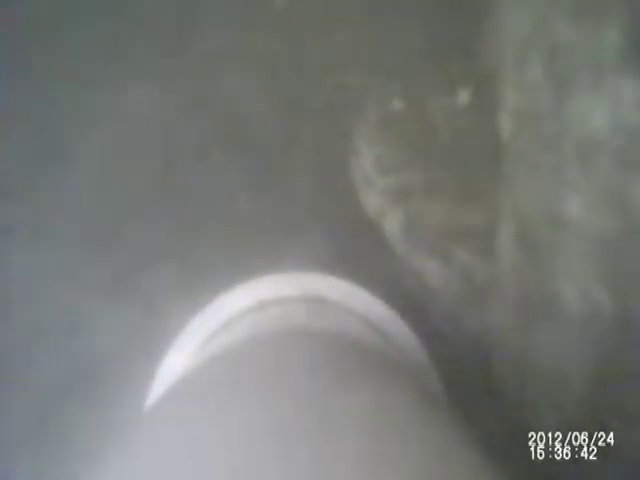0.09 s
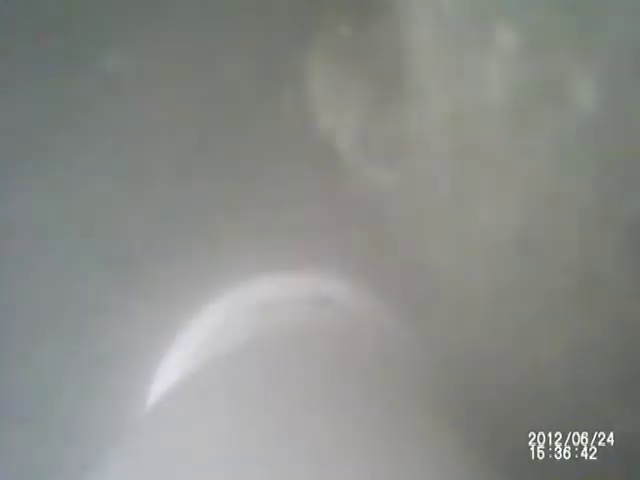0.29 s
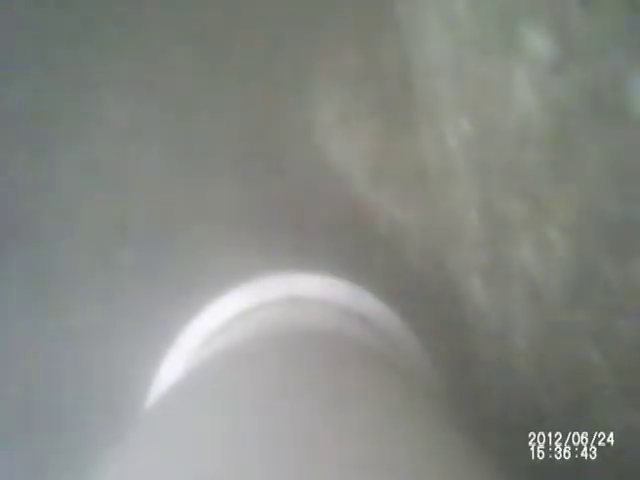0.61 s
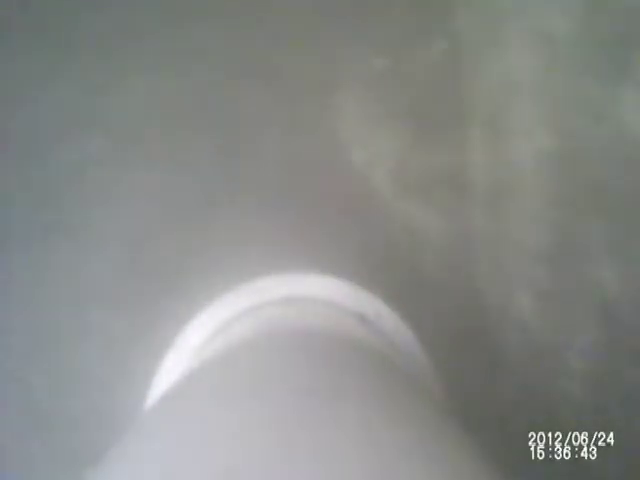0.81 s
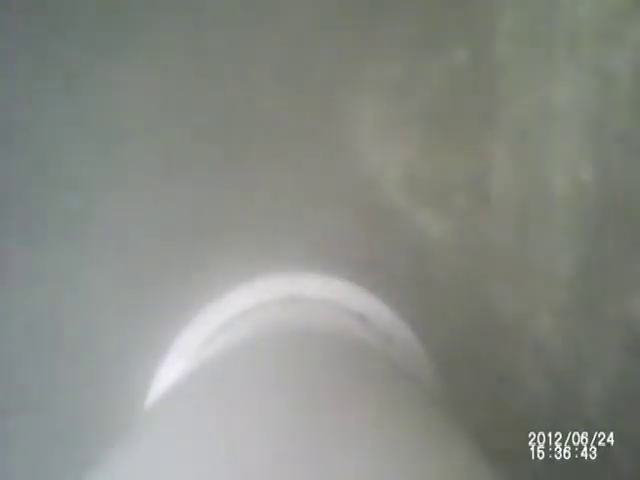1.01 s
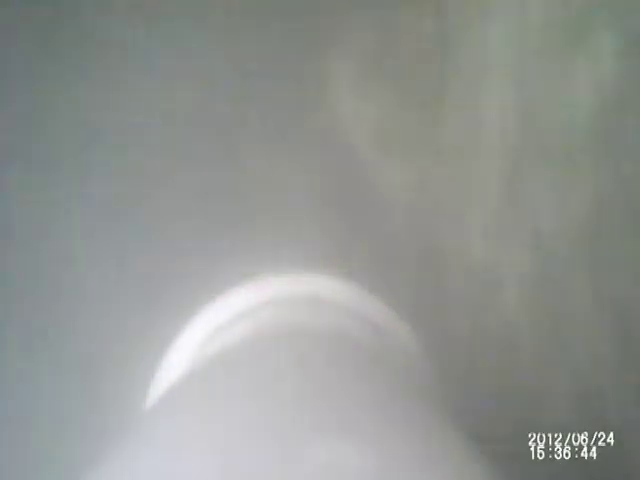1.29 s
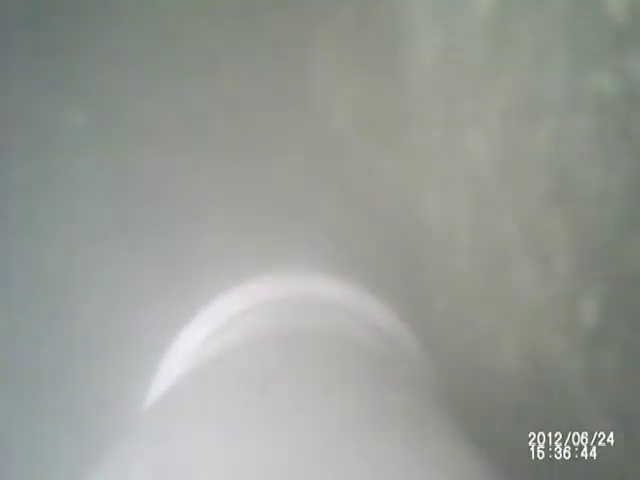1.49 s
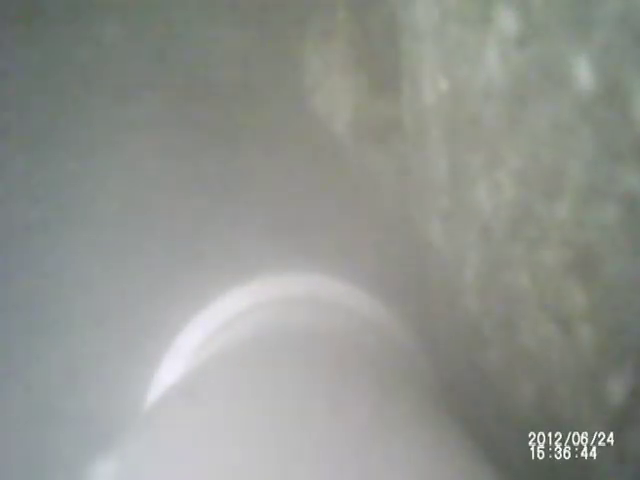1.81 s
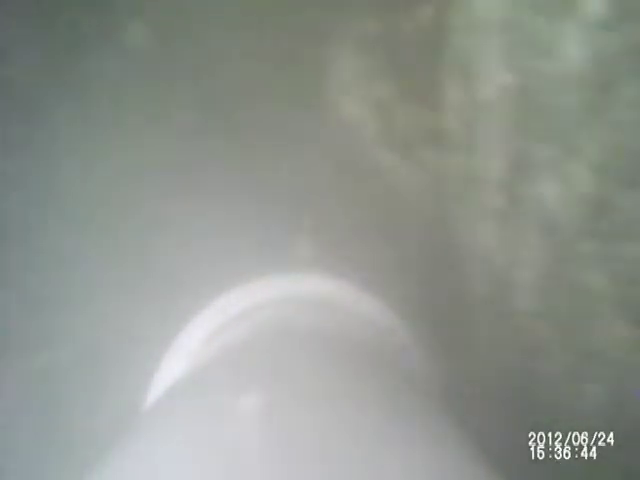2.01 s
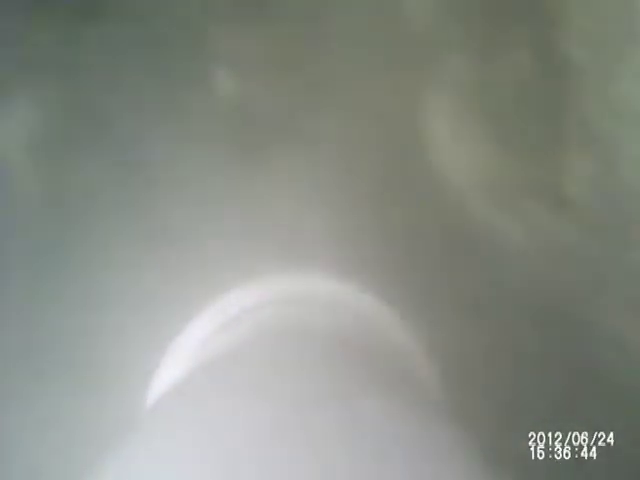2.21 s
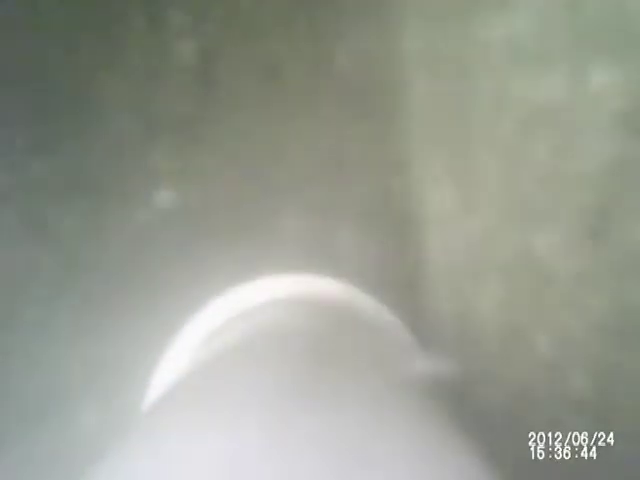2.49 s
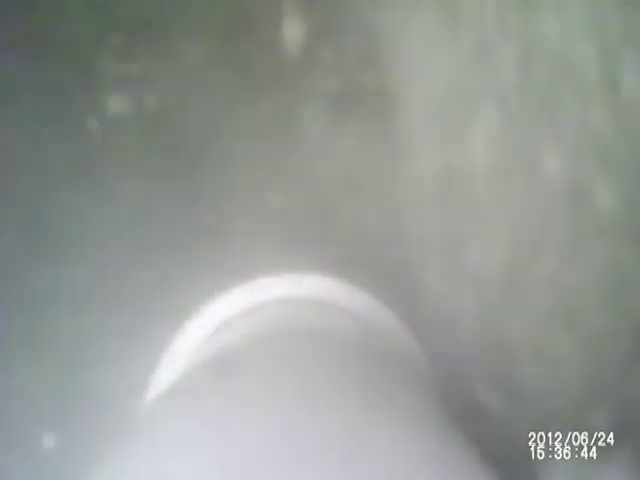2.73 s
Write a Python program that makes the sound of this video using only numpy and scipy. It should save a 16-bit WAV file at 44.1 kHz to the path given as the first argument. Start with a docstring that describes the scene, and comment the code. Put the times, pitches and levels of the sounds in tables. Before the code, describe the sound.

Stones clatter on a steel suction nozzle underwater: a dense burst of hard clicks, then scattered knocks, heavy thumps and gritty rattle over a faint water rush, captured very close by a small, overloading camera microphone.

```python
"""Stones click sharply on the steel of an underwater suction nozzle: damped modes under a short contact.
Larger rocks thump the pipe and camera housing, as low modes with a settling pitch; one faint gurgle is
made the same way. Fine grit rattles and rumbles, as random clumped blows on the modes, over the rush of
water, which is coloured noise. A small camera overloads on loud blows and samples slowly, which mirrors
the sound into the treble."""
import sys
import numpy as np
from scipy import signal
from scipy.fft import rfft, irfft
from scipy.io import wavfile
from scipy.ndimage import uniform_filter1d

SR = 44100
rng = np.random.default_rng(int(sys.argv[2]) if len(sys.argv) > 2 else 0)


def materialize(psi):
    """Save the field psi as 16-bit PCM at rate SR to the path in sys.argv[1].

    A 1-D psi becomes a single channel; in a 2-D psi each row is a channel.
    """
    bounded = np.clip(np.atleast_2d(psi).T, -1, 1)
    quanta = np.round(bounded * 32767).astype(np.int16)
    wavfile.write(sys.argv[1], SR, quanta)


N = 127890  # length [samples]
MODE_SCATTER_DB = 1.5  # standard deviation of mode strengths from blow to blow
STONE_RING_T60_S = 0.011  # decay of the stone's own ring, and of the grit's dry crack


def amp(db):
    """Decibel law: 20 dB is a factor of ten in amplitude."""
    return 10 ** (np.asarray(db) / 20)


def evened(x):
    """Normalization to unit root-mean-square value."""
    return x / np.sqrt(np.mean(x ** 2) + 1e-20)


def add(mix, start_s, sound):
    """Superposition: pressures from separate events add."""
    part = mix[max(round(start_s * SR), 0):][:len(sound)]
    part += sound[:len(part)]


def ring(t, hz, db, t60, phase=0):
    """Free damped vibration: one mode falls 60 dB in t60 seconds; phase is in cycles."""
    return amp(db - 60 * t / t60) * np.sin(2 * np.pi * (hz * t + phase))


def struck_modes(t, modes, detune):
    """Modal superposition: each blow excites the modes with its own tuning, strength and phase."""
    total = np.zeros(len(t))
    for hz, db, t60 in modes:
        tuning, strength, phase = rng.standard_normal(3)
        total += ring(t, hz * (1 + detune * tuning), db + MODE_SCATTER_DB * strength, t60, phase)
    return total


# modes of the steel nozzle, before scatter: (frequency [Hz], level [dB], t60 [s])
STEEL_MODES = [(390.5, -28.5, 0.058), (780, -3.5, 0.0092), (1243, -8, 0.012), (1666, -6.5, 0.018),
               (2000, -0.5, 0.011), (2350, -15.5, 0.023), (2718, -9.5, 0.012), (3227, -1.5, 0.0098)]
CONTACT_MS, CONTACT_DB_PER_DOUBLING = 0.63, 68.5  # contact time at 0 dB; heavier stones touch for longer
STONE_NOTE_DB, STONE_RING_DB, CRACK_DB = -9.5, 2, -3.5  # note in contact, ring after it, dry noise
ROUGHNESS = 0.5  # depth of random flutter that roughens the whole click


def click(db, hz):
    """Impact excitation: a note and dry crack swell in contact, then modes ring; random flutter roughens all."""
    rasp = rng.standard_normal(2000)
    t = np.arange(len(rasp)) / SR
    contact_s = CONTACT_MS / 1000 * 2 ** (db / CONTACT_DB_PER_DOUBLING)
    u = t / contact_s
    ringing = struck_modes(t, STEEL_MODES, 0.069) + ring(t, hz, STONE_RING_DB, STONE_RING_T60_S)
    contact = amp(STONE_NOTE_DB) * np.sin(2 * np.pi * hz * t) + amp(CRACK_DB) * rasp
    sound = (1 - np.exp(-u)) ** 2 * ringing + u ** 2 * np.exp(-u) * contact
    # reversing the noise sets the flutter apart from the crack
    flutter = evened(uniform_filter1d(rasp[::-1], size=40))
    return amp(db) * sound * (1 + ROUGHNESS * flutter)


# stones striking the nozzle: (time [s], level [dB], stone pitch [Hz])
STONE_STRIKES = [(0.004, -29, 1840), (0.0284, -19.5, 1940), (0.1796, -11, 1790), (0.2137, -3, 2680),
                 (0.2187, -6.5, 840), (0.2394, 7.5, 906), (0.2452, 2, 850), (0.2506, 9, 750),
                 (0.2645, 11.5, 2030), (0.2802, 0, 1800), (0.2938, 1, 2000), (0.3089, 13, 2050),
                 (0.3223, 9, 3260), (0.327, 2, 535), (0.3377, 10.5, 2360), (0.3506, 17, 3230),
                 (0.3562, 18, 3293), (0.3653, 12, 1980), (0.3829, 7, 1360), (0.3955, 20, 2660),
                 (0.3999, 17, 1900), (0.4046, 12, 2310), (0.422, 13, 1580), (0.428, 3, 2150),
                 (0.453, 11, 1111), (0.4581, 3.5, 580), (0.472, 2, 2280), (0.4834, 1, 2030),
                 (0.5111, -3, 1960), (0.529, -0.5, 2005), (0.5345, -4, 1550), (0.54, -2, 1860),
                 (0.561, 4.5, 780), (0.569, 10, 3110), (0.588, -6, 2180), (0.598, -5.5, 710),
                 (0.6085, -9.5, 780), (0.6276, 11, 763), (0.6503, -12, 1540), (0.6647, -12, 840),
                 (0.738, -2, 2000), (0.7709, -6, 1950), (0.782, -3, 2080), (0.7886, -4, 1880),
                 (0.8045, 0, 2350), (0.814, -5, 1700), (0.827, -3.5, 2020), (0.855, 0, 2150),
                 (0.8714, 0.5, 2250), (0.93, -8, 2180), (0.9426, -1, 2140), (1.0976, 2, 1810),
                 (1.1451, -9.5, 1820), (1.1829, -5, 1420), (1.188, -1, 1790), (1.2076, -10, 1800),
                 (1.218, -15, 1920), (1.237, -9, 2000), (1.2511, 5, 1950), (1.2612, 7, 2350),
                 (1.2855, -7, 1770), (1.3001, 8.5, 2310), (1.3081, 11, 1810), (1.337, -8, 1800),
                 (1.3446, -1, 940), (1.3556, 5.5, 603), (1.3729, 7, 2100), (1.38, 3.5, 2000),
                 (1.4332, 16.5, 2048), (1.4543, 19, 2013), (1.4741, -3, 2160), (1.4904, 8, 2000),
                 (1.501, 1.5, 2000), (1.508, -2, 2100), (1.5384, 6, 2050), (1.5534, 2, 2110),
                 (1.618, -14.5, 2000), (1.627, -8, 1560), (1.6431, 17, 2000), (1.649, 8, 2010),
                 (1.6529, 24, 2074), (1.7244, -12, 2070), (1.739, -16, 810), (1.7696, -16, 2000),
                 (1.782, 6.5, 1720), (1.818, -13.5, 1940), (1.846, -5, 2350), (1.8616, -5.5, 2100),
                 (1.9048, -16.5, 1534), (1.944, -16.5, 1860), (1.9551, -12, 2020), (1.9619, -9, 2120),
                 (1.9855, -0.5, 1956), (2.0001, -1.5, 1910), (2.018, -14, 2140), (2.0312, -2.5, 1640),
                 (2.0457, -15.5, 1730), (2.139, -18, 1900), (2.1531, -16.5, 554), (2.1819, -8, 1920),
                 (2.197, -20, 1850), (2.2136, -19.5, 2040), (2.2388, -19.5, 2000), (2.248, -13.5, 1850),
                 (2.2748, -20.5, 1910), (2.365, 11, 858), (2.379, 27, 633.6), (2.4387, -16, 1440),
                 (2.4732, -8, 860), (2.4832, -6, 900), (2.4956, 6.5, 880), (2.5054, 5.5, 750),
                 (2.5287, 14, 1670), (2.5608, 18.5, 2480), (2.578, -7, 2000), (2.5864, -4, 1970),
                 (2.5991, -8, 1310), (2.6103, -0.5, 3200), (2.632, -6.5, 2100), (2.638, -12, 2080),
                 (2.6567, -17, 3660), (2.6755, -10.5, 2240), (2.7061, -12.5, 1930), (2.733, -25, 2030),
                 (2.7628, -23, 680), (2.791, -17.5, 2130), (2.8113, -15.5, 1540), (2.8585, -10.5, 910)]


def stones_on_steel():
    """Superposition of separate impacts on the nozzle."""
    layer = np.zeros(N)
    for start_s, db, hz in STONE_STRIKES:
        add(layer, start_s, click(db, hz))
    return layer


THUD_RISE_S = 0.0024  # time constant of the soft start
LOW_MODE_RATIO, LOW_MODE_DB = 0.579, -5.5  # a second, lower mode of the pipe
HOSE_HZ, HOSE_DB, HOSE_T60_S = 162.8, -16.5, 0.049  # the hose shakes on after each thump
SAG, SAG_S = 0.21, 0.0021  # starting pitch excess (fraction) and its time constant


def thud(db, hz, t60):
    """Modal superposition: two pipe modes, the upper falling in pitch as the pipe relaxes, and the hose."""
    t = np.arange(8000) / SR
    t60 = max(t60, 0.01)
    bend = SAG * SAG_S * hz * (1 - np.exp(-t / SAG_S))  # integral of the pitch excess [cycles]
    modes = ring(t, hz, 0, t60, bend) + ring(t, hz * LOW_MODE_RATIO, LOW_MODE_DB, t60)
    modes += ring(t, HOSE_HZ, HOSE_DB, HOSE_T60_S)
    return amp(db) * (1 - np.exp(-t / THUD_RISE_S)) * modes


# rocks thumping the pipe, and one faint gurgle at 2.24 s:
# (time [s], level [dB], settled pitch [Hz], t60 [s])
THUMPS_AND_GURGLE = [(0.026, -20.5, 235, 0.11), (0.208, -8, 200, 0.087), (0.252, 4.5, 315, 0.031),
                     (0.29, -6.5, 406, 0.19), (0.315, -4, 330, 0.023), (0.327, -4.5, 351.3, 0.16),
                     (0.448, 4, 176.5, 0.051), (0.531, -4, 395, 0.085), (0.561, 15, 299, 0.032),
                     (0.622, -9.5, 228, 0.1), (0.907, -11.5, 288, 0.048), (1.179, 11.5, 282, 0.027),
                     (1.307, 0, 447, 0.022), (1.356, 15.5, 484, 0.021), (1.403, -1, 236, 0.053),
                     (1.429, 18, 305, 0.017), (1.646, 20, 247, 0.034), (1.66, 7, 396, 0.071),
                     (1.696, 7, 211, 0.018), (1.779, -13, 562, 0.038), (2.24, -21, 684, 0.089),
                     (2.378, 17, 383, 0.027), (2.5, -10, 455, 0.089), (2.56, 22, 294, 0.022),
                     (2.601, -1.5, 161.4, 0.067), (2.731, -5.5, 418, 0.026), (2.77, -15, 360, 0.028),
                     (2.865, -5, 413, 0.021)]


def thumps_and_gurgle():
    """Superposition of separate low sounds: rocks thumping the pipe, and one faint gurgle at 2.24 s."""
    layer = np.zeros(N)
    for start_s, *row in THUMPS_AND_GURGLE:
        add(layer, start_s, thud(*row))
    return layer


CLUMP_S, CLUMP_DB = 0.014, 2.5  # grit arrives in small clumps: smoothing time, spread of blow size
# levels through time, joined by straight lines: (time [s], grit level [dB], rumble level [dB])
GRIT_LEVELS = [(0, -24, -29), (0.044, -37.5, -31.5), (.065, -50.5, -53), (0.168, -39, -40),
               (0.216, -17.5, -20), (0.418, -16.5, -22.5), (.5, -32, -24), (.7, -21.5, -21.5),
               (.95, -22.5, -28.5), (1.15, -34, -32.5), (1.33, -30, -26.5), (1.424, -13, -16),
               (1.53, -31, -31.5), (1.579, -37.5, -43.5), (1.898, -37, -32.5), (2.08, -31.5, -36),
               (2.13, -40.5, -40), (2.252, -32, -32.5), (2.33, -48, -52), (2.471, -25.5, -25.5),
               (2.6, -37, -25.5), (2.7, -40.5, -27), (2.9, -43, -28.5)]


def rattle(modes, per_s, spread_db, detune, level_column, crack=0):
    """Shot noise: random small blows in clumps, convolved with 16 impulse responses of the modes."""
    crowding = uniform_filter1d(rng.standard_normal(N), max(round(CLUMP_S * SR), 2))
    clump = amp(CLUMP_DB * evened(crowding))
    strength = amp(spread_db * np.minimum(rng.exponential(1, N), 4))
    blows = clump * strength * (rng.random(N) < per_s / SR)
    kind = rng.integers(0, 16, N)
    t = np.arange(3000) / SR
    out = np.zeros(N)
    for k in range(16):
        tap = struck_modes(t, modes, detune)
        tap += crack * rng.standard_normal(len(t)) * amp(-60 * t / STONE_RING_T60_S)
        tap *= np.minimum(t / 0.00091, 1) ** 2  # rise over 0.91 ms
        out += signal.oaconvolve(blows * (kind == k), tap)[:N]
    levels = np.transpose(GRIT_LEVELS)
    level_db = np.interp(np.arange(N) / SR, levels[0], levels[level_column])
    return amp(level_db) * evened(out)


GRIT_PER_S, GRIT_SPREAD_DB, GRIT_CRACK_DB = 1100, 4, -22.5
FAVOURED_HZ, FALL_DB_PER_OCTAVE = 1850, 3.5  # the modes around this pitch respond most
GRIT_RING = 1.3  # factor on t60: light grit damps the steel less


def grit():
    """Selective modal excitation: light grit mostly wakes the strongest part of the steel's response."""
    modes = []
    for hz, db, t60 in STEEL_MODES:
        fall_db = FALL_DB_PER_OCTAVE * abs(np.log2(hz / FAVOURED_HZ))
        modes.append((hz, db - fall_db, t60 * GRIT_RING))
    return rattle(modes, GRIT_PER_S, GRIT_SPREAD_DB, 0.088, 1, amp(GRIT_CRACK_DB))


RUMBLE_PER_S, RUMBLE_SPREAD_DB = 400, 1
# low modes of the rumble, before scatter: (frequency [Hz], relative level [dB], t60 [s])
RUMBLE_MODES = [(113.5, -6.5, 0.16), (158, 2.5, 0.04), (290, -19, 0.02), (425.6, 7.5, 0.05),
                (540, -2, 0.015), (750, 9.5, 0.01)]


def rumble():
    """Random excitation of low resonances: dense small blows merge into a rumble."""
    return rattle(RUMBLE_MODES, RUMBLE_PER_S, RUMBLE_SPREAD_DB, 0.077, 2)


WATER_DB = -45.5  # overall level
# spectrum of the water noise: (frequency [Hz], relative spectral level [dB])
WATER_SPECTRUM = [(70, -30), (120, -1), (290, -20), (425, 5), (520, 1), (1300, -11), (1950, -7),
                  (2600, -26.5), (4000, -15)]


def water():
    """Stationary coloured noise: the steady rush through the pipe is white noise shaped in frequency."""
    hz = np.fft.rfftfreq(N, 1 / SR)
    points_hz, points_db = np.transpose(WATER_SPECTRUM)
    colour = amp(np.interp(np.log(hz + 1), np.log(points_hz), points_db))
    noise = irfft(rfft(rng.standard_normal(N)) * colour, N)
    return amp(WATER_DB) * evened(noise)


def scene():
    """Linear superposition of all sources, alike in both channels."""
    mix = stones_on_steel() + thumps_and_gurgle() + grit() + rumble() + water()
    return np.array([mix, mix])


BASS_HZ, TOP_HZ, EDGE_HZ = 135, 4020, 15850  # bass cut, treble cut before sampling, final band limit
CLIP, KNEE = 0.985, 2.5  # overload ceiling (full scale = 1) and sharpness of its bend
SAMPLE_HZ = 8000  # slow sampling rate


def record(dry):
    """Saturation and spectral imaging: thin bass, overload, slow sampling joined by lines, band limit."""
    x = signal.sosfilt(signal.butter(2, BASS_HZ, "high", fs=SR, output="sos"), dry[0])
    x = signal.oaconvolve(x, signal.firwin(101, TOP_HZ, fs=SR), "same")
    x = x / (1 + abs(x / CLIP) ** KNEE) ** (1 / KNEE)
    t = np.arange(N) / SR
    ticks = np.arange(0, N / SR, 1 / SAMPLE_HZ)
    samples = np.interp(ticks, t, x)
    x = np.interp(t, ticks, samples)  # straight lines leave mirror images in the treble
    x = signal.oaconvolve(x, signal.firwin(511, EDGE_HZ, window=("kaiser", 9), fs=SR), "same")
    return np.clip([x, x], -1, 1)


dry = scene()
out = record(dry)
materialize(out)
```